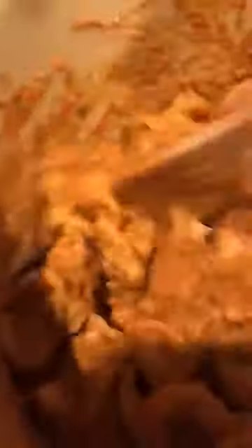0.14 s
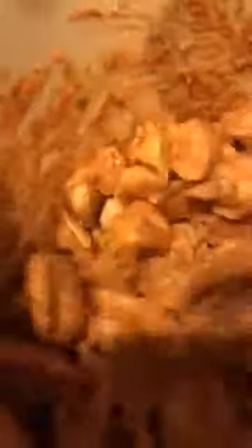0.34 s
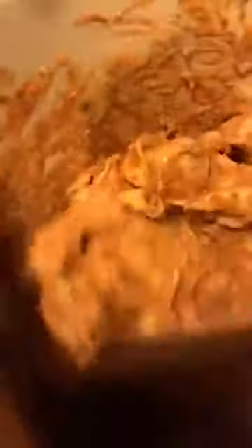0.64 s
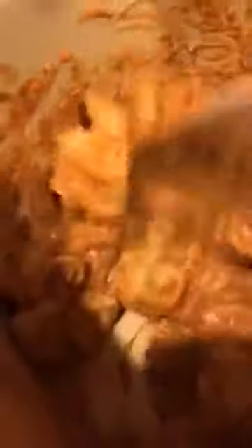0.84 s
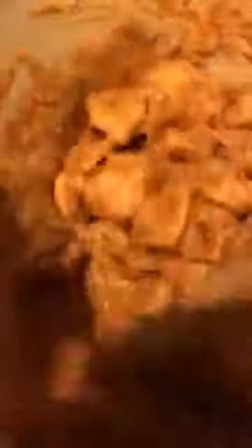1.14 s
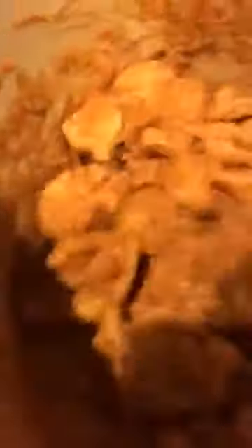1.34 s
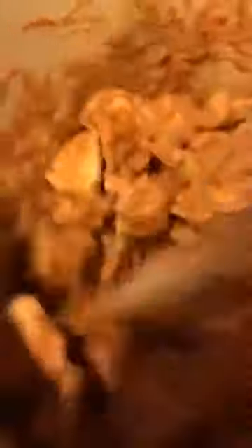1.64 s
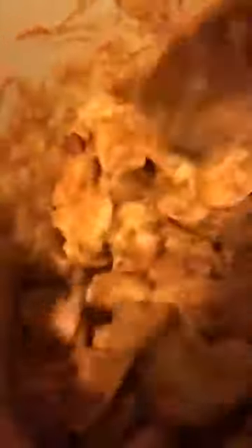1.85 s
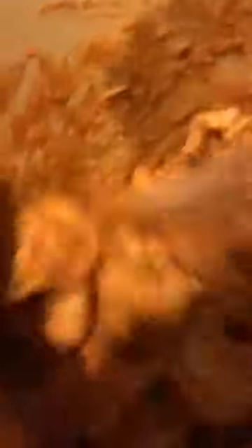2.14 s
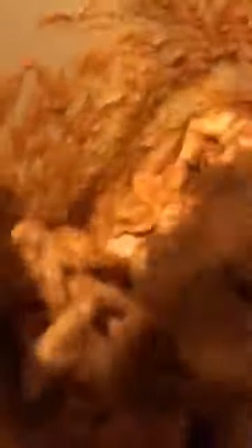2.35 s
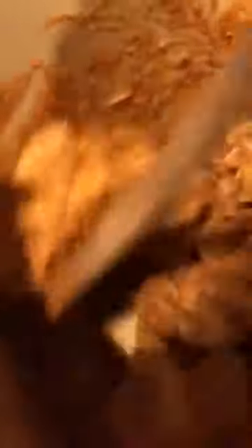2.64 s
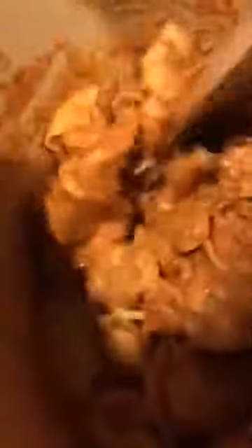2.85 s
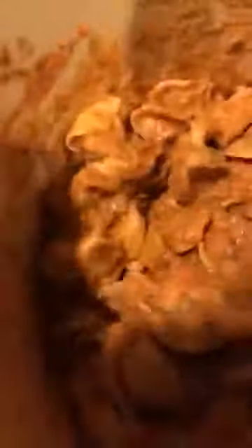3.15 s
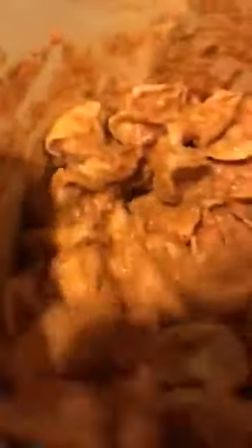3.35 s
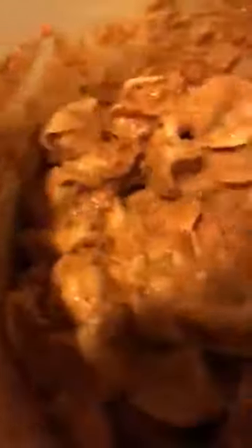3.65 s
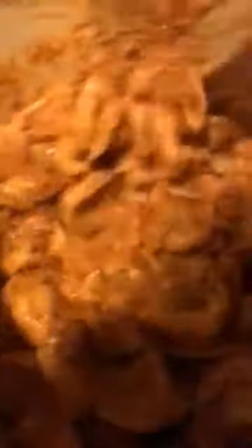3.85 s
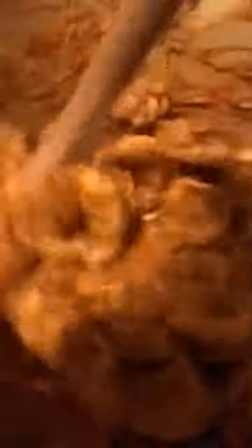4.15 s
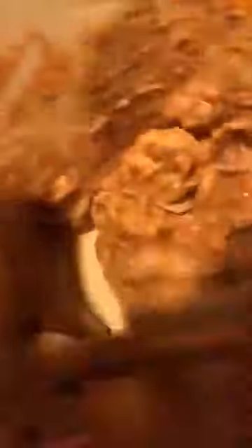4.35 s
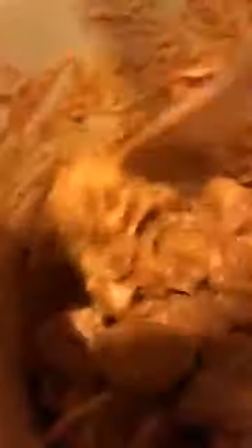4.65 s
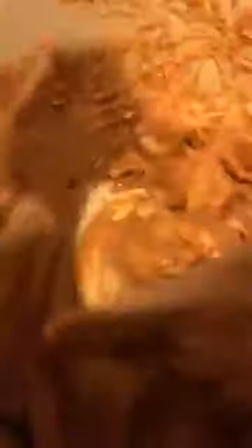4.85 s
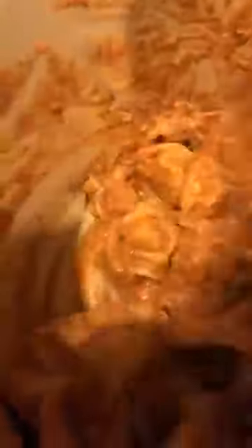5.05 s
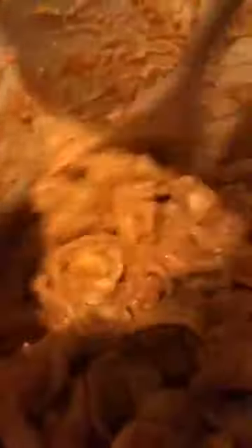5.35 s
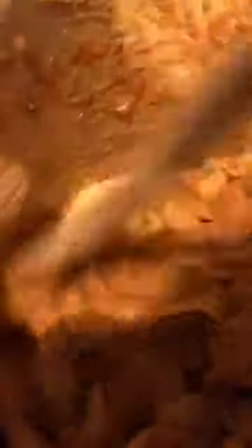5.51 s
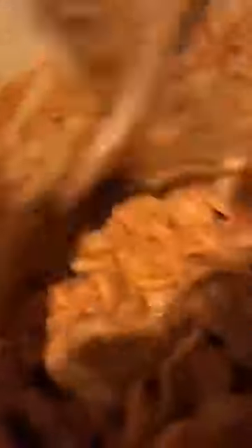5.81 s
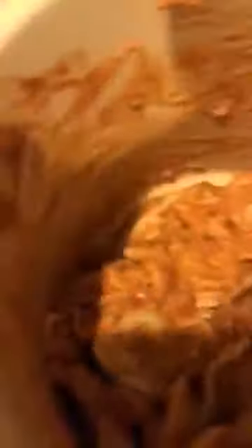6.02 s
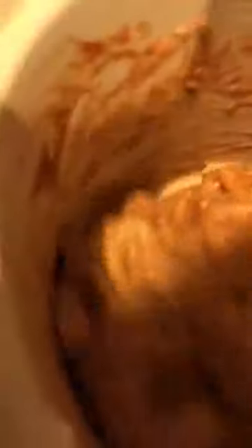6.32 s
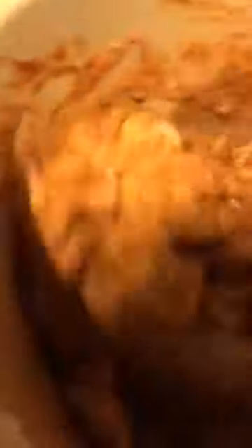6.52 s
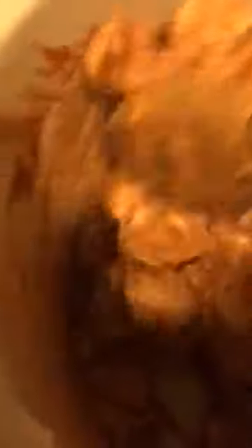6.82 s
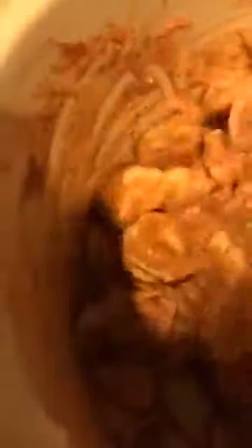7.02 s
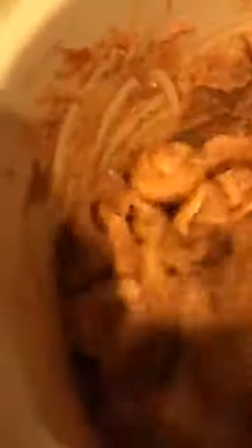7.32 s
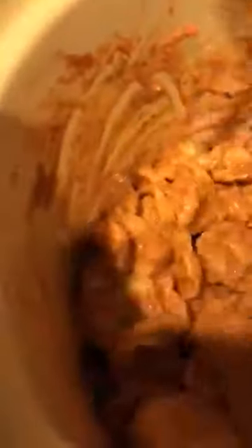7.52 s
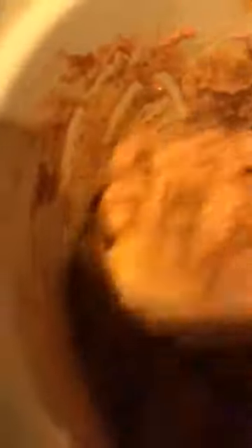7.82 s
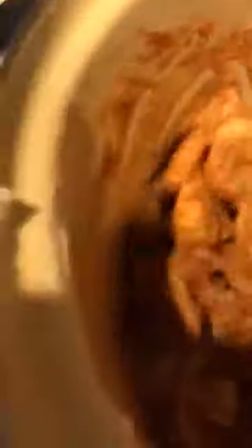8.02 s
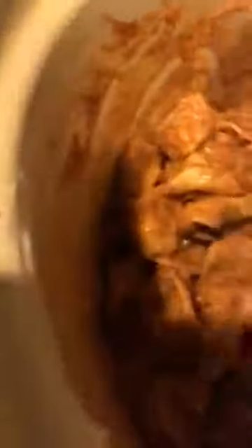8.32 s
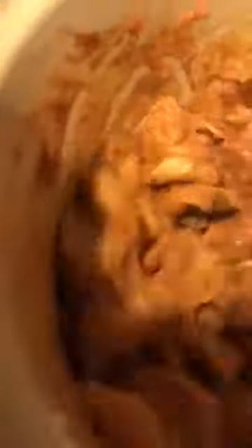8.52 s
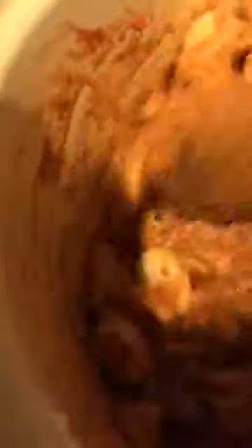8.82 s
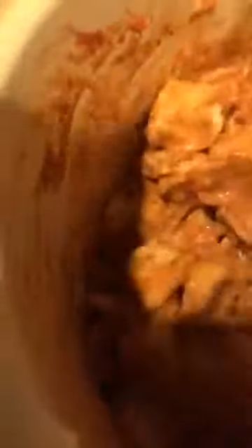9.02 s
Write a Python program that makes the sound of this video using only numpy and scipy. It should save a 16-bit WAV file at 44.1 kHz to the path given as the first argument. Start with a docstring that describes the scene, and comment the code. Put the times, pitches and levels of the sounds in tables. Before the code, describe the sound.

Wet, sticky squelches come in uneven strokes, about two a second, as pasta is folded through heavy sauce in a pot. Small pops and crisp wet snaps run all through it, over faint hollow rubbing and soft thuds. Every so often the wooden spoon hits the pot wall with a dull knock or a sharper clack. The sound is close, in a quiet kitchen with a slight room echo.

```python
"""A small kitchen: a wooden spoon stirs pasta through thick sauce in a deep pot, close to a mono microphone.
Each stroke squelches and crackles, and the spoon hums along the wall. Air pockets pop, films of sauce
snap and the mass slumps with low thumps. The spoon knocks the pot, whose ring the sauce damps.
The room answers over a quiet floor."""
import sys
import numpy as np
from scipy import signal
from scipy.fft import rfft, irfft, next_fast_len
from scipy.io import wavfile
from scipy.ndimage import uniform_filter1d, map_coordinates

SR = 44100
rng = np.random.default_rng(int(sys.argv[2]) if len(sys.argv) > 2 else 0)


def transcribe(signal):
    """Save signal, clipped to [-1, 1], as a 16-bit WAV file at the path in sys.argv[1]."""
    frames = np.atleast_2d(signal).T
    limited = np.clip(frames, -1, 1)
    pcm = np.round(limited * 32767).astype(np.int16)
    wavfile.write(sys.argv[1], SR, pcm)


N = 404397

# spectrum of sliding sauce: freq_hz, density_db
SQUELCH = [(88, -37), (150, -33), (231, -12), (325, -2), (397, -6.5), (592, -6), (713, -15.5), (1150, -1.5),
           (1940, -3.5), (2300, -6), (3140, -10.5), (3550, -18), (6000, -36), (7800, 6.5), (13200, -120)]
# spectrum of bursting films: freq_hz, density_db
CRACKLE = [(1180, -6.5), (2000, -36.5), (2280, -4.5), (3140, -9.5), (3550, -3.5), (6190, -9.5),
           (10400, -18.5), (13500, -20), (15800, -28), (16500, -52.5)]


def amp(db):
    """Decibels to gain."""
    return 10 ** (np.asarray(db) / 20)


def unit(x):
    """Scale to rms 1."""
    return x / np.sqrt(np.mean(x ** 2) + 1e-20)


def along(points, hz):
    """Read (freq_hz, value) points on a log axis."""
    freq_hz, values = np.transpose(points)
    return np.interp(np.log(hz + 1), np.log(freq_hz + 1), values)


def filtered(x, response):
    """Apply a frequency response."""
    size = next_fast_len(len(x) + 8192)
    return irfft(rfft(x, size) * response(np.fft.rfftfreq(size, 1 / SR)), size)[:len(x)]


def muffled(x, cutoff_hz=5000):
    """Steep low-pass."""
    return filtered(x, lambda hz: 1 / (1 + (hz / cutoff_hz) ** 8))


def coloured(x, spectrum):
    """Shape by a spectrum; rms 1."""
    return unit(filtered(x, lambda hz: amp(along(spectrum, hz))))


def patchy(spectrum, wander_db):
    """Noise whose gain wanders in small time-frequency patches; rms 1."""
    bins = signal.stft(rng.standard_normal(N), nperseg=256)[2]
    field = uniform_filter1d(rng.standard_normal(bins.shape), size=7, axis=0)
    field = uniform_filter1d(field, size=5, axis=1)
    noise = signal.istft(bins * amp(wander_db * unit(field)), nperseg=256)[1]
    return coloured(noise[:N], spectrum)


def add(track, start_s, sound):
    """Mix a sound into the track."""
    track[round(start_s * SR):][:len(sound)] += sound


def swell(t, rise_s, t60_s):
    """Envelope of a soft wet contact: gradual rise, then decay."""
    return (1 - np.exp(-t / rise_s)) ** 2 * amp(-60 * t / t60_s)


def bumps(rows):
    """Sum of envelopes with exponential rise and fall."""
    t = np.arange(N) / SR
    return sum(amp(db) * np.exp(-np.where(t < peak_s, (peak_s - t) / rise_s, (t - peak_s) / fall_s))
               for peak_s, db, rise_s, fall_s in rows)


def bubbles(count, centre_hz, spread_oct, decay_cycles, spread_db):
    """Tiny bubbles at random times: damped sines, pitch rising as they open."""
    when, pitch, size = rng.random(count), rng.standard_normal(count), rng.random(count)
    hz = np.clip(centre_hz * 2 ** (spread_oct * pitch), 250, 15000)[:, None]
    age = np.arange(500)
    cycles = hz * age / SR
    envelope = (1 - np.exp(-cycles)) * np.exp(-cycles / decay_cycles)
    chirps = np.sin(2 * np.pi * cycles * (1 + 0.011 * cycles))
    waves = amp(spread_db * size ** 3)[:, None] * chirps * envelope
    index = (when * N).astype(int)[:, None] + age
    return np.bincount(index.ravel(), waves.ravel(), N + len(age))[:N]


def stroke_gains():
    """Squelch, crackle and scrape gains: a stroke rises fast, sags as the spoon slows, dies away."""
    # spoon strokes: start_s, length_s, squelch_db, crackle_db, scrape_db
    strokes = [(0, 0.35, -53, -55, -51), (0.558, 0.38, -47.5, -61, -60), (1.042, 0.42, -54, -57.5, -66),
               (2, .38, -60.5, -59, -61), (2.489, 0.39, -49.5, -59.5, -57.5),
               (3.021, 0.35, -53.5, -57, -65), (3.503, 0.36, -76, -61.5, -51.5),
               (4.052, 0.26, -55, -62, -53), (4.394, 0.66, -52.5, -55.5, -58),
               (5.139, 0.48, -49.5, -58, -56.5), (5.784, 0.54, -69.5, -63, -57.5),
               (6.115, 0.6, -57, -62, -51.5), (6.928, 0.46, -56, -61.5, -61), (7.662, 0.41, -56, -63, -62),
               (8.26, 0.47, -56, -66.5, -77), (8.78, 0.43, -59.5, -65, -74)]
    rise_db_per_s, sag_db_per_s, fall_db_per_s = 288.5, 7, 155.5
    rest_db = (-76, -74, -74)
    t, power = np.arange(N) / SR, amp(rest_db)[:, None] ** 2
    for start_s, length_s, *levels_db in strokes:
        shape_db = (-rise_db_per_s * np.maximum(start_s - t, 0)
                    - sag_db_per_s * np.maximum(t - start_s, 0)
                    - fall_db_per_s * np.maximum(t - start_s - length_s, 0))
        power = power + (amp(levels_db)[:, None] * amp(shape_db)) ** 2
    return np.sqrt(power)


def stirring(squelch_gain, crackle_gain):
    """Bubbles and films burst in clumps as the sauce slides and the pasta peels apart."""
    # folds of pasta parting: peak_s, level_db, time_constant_s
    peels = [(0.13, -41, .03), (0.313, -46, 0.055), (0.574, -41, 0.014), (0.661, -40, 0.018),
             (1.179, -41, 0.026), (1.48, -50.5, 0.064), (1.667, -38, 0.065), (2.197, -27, 0.02),
             (2.529, -37, 0.028), (2.896, -49.5, 0.027), (3.125, -50, 0.025), (3.267, -44, 0.016),
             (3.688, -41.5, 0.093), (4.272, -38.5, 0.019), (4.644, -36, 0.051), (4.85, -35.5, .03),
             (5.219, -38.5, 0.018), (5.58, -46, 0.02), (5.812, -48, 0.031), (5.973, -40, 0.01),
             (6.09, -47, 0.056), (7.004, -49, 0.045), (7.336, -51, 0.028), (7.726, -50.5, .03),
             (7.82, -57, 0.06), (8.46, -51.5, 0.08), (8.795, -61, 0.013), (9.02, -64, 0.061)]
    peel_gain = bumps((peak_s, db, tau_s, tau_s) for peak_s, db, tau_s in peels)
    clumps = map_coordinates(rng.standard_normal(N // 1000 + 4), [np.arange(N) / 1000])
    films = bubbles(count=8000, centre_hz=4200, spread_oct=0.8, decay_cycles=3, spread_db=13)
    films = unit(filtered(films, lambda hz: hz > 2000))
    slide = patchy(SQUELCH, wander_db=3.5)
    froth = bubbles(count=9000, centre_hz=1600, spread_oct=1.1, decay_cycles=1.6, spread_db=13)
    squelch = muffled(amp(3.15 * clumps) * coloured(froth, SQUELCH) + amp(-4.5) * slide)
    crackle = amp(5.9 * clumps - 2) * films + amp(1) * patchy(CRACKLE, wander_db=6.3)
    return (amp(-6.5) * (squelch_gain + peel_gain) * squelch
            + amp(-4) * (crackle_gain + amp(-17.5) * peel_gain) * crackle)


def scraping(scrape_gain):
    """Wood rubbing through sauce keeps the hollow of the pot humming."""
    # resonances of the rubbed pot: centre_hz, width_hz, level_db
    resonances = [(330, 120, -8.5), (520, 58, 1.5), (800, 65, -1.5), (970, 97, -2), (1400, 70, -13)]

    def hollow(hz):
        return sum((-1) ** k * amp(db) * 1j * hz * width_hz
                   / (centre_hz ** 2 - hz ** 2 + 1j * hz * width_hz)
                   for k, (centre_hz, width_hz, db) in enumerate(resonances))

    return amp(-6) * scrape_gain * unit(filtered(rng.standard_normal(N), hollow))


def pops():
    """An air pocket rings briefly, pitch rising as it opens, inside a wet smack."""
    # bursting pockets: start_s, tone_db, pitch_hz, smack_db
    pockets = [(.049, -37, 1030, -33.5), (.219, -30, 1080, -35), (.248, -27, 413, -34),
               (0.25, -27.5, 1320, -46), (.292, -25.5, 450, -36), (.309, -28.5, 1045, -33),
               (.372, -43, 1350, -34.5), (.427, -42, 520, -35), (.653, -33.5, 540, -34),
               (0.759, -36.5, 1770, -42), (.858, -48, 1320, -36), (.927, -34, 1370, -36.5),
               (.942, -35, 990, -33), (.99, -46, 1210, -53), (1.021, -38, 4200, -32.5),
               (1.03, -46, 1190, -30), (1.183, -37, 516, -50), (1.19, -30, 1480, -29.5),
               (1.28, -48, 464, -38), (1.295, -43, 2200, -44), (1.418, -35.5, 1050, -44),
               (1.432, -38, 1040, -36), (1.487, -37, 1500, -43), (1.497, -26.5, 1660, -25),
               (1.636, -23.5, 2170, -45), (1.672, -35, 1350, -30), (1.896, -45, 1670, -43),
               (2.018, -49, 1020, -30.5), (2.038, -40, 2500, -26), (2.102, -41, 940, -34.5),
               (2.131, -35.5, 960, -36), (2.16, -47, 1440, -55), (2.183, -27.5, 367, -31),
               (2.197, -28.5, 1100, -22.5), (2.219, -45, 1210, -29), (2.256, -38, 1282, -54),
               (2.326, -49, 2470, -39), (2.456, -44.5, 2100, -48.5), (2.738, -38.5, 1000, -33),
               (2.791, -48, 1320, -32), (2.817, -37, 2100, -39), (2.839, -39, 1110, -33),
               (2.889, -35.5, 1086, -41), (2.992, -47, 1130, -45), (3.089, -38, 1090, -34.5),
               (3.13, -34.5, 1390, -37), (3.16, -37, 1520, -36), (3.194, -40, 1340, -46),
               (3.243, -34.5, 3740, -33), (3.289, -32.5, 1210, -28), (3.325, -36.5, 3580, -41.5),
               (3.393, -36.5, 3360, -44), (3.53, -51, 993, -32.5), (3.629, -35, 540, -46),
               (3.65, -36.5, 544, -29.5), (3.797, -37, 523, -41), (3.906, -44, 870, -60.5),
               (3.955, -44, 925, -52), (4.032, -34, 1470, -34.5), (4.061, -34, 1320, -40.5),
               (4.077, -40.5, 620, -39), (4.097, -50, 1450, -31.5), (4.294, -37.5, 1030, -36),
               (4.396, -39, 3320, -56), (4.439, -45, 447, -31), (4.48, -36, 1800, -53),
               (4.514, -35, 1560, -52), (4.526, -32, 1680, -29), (4.567, -38, 1050, -33),
               (4.582, -29.5, 1050, -28), (4.605, -31, 2280, -45), (4.622, -32, 403, -41),
               (4.634, -26, 1120, -28.5), (4.657, -35, 1220, -20), (4.745, -37, 428, -37),
               (4.79, -42, 1100, -32), (4.879, -30, 1090, -39.5), (4.966, -44, 2680, -39),
               (5.049, -45, 1490, -48), (5.295, -41, 1370, -40.5), (5.333, -33, 1110, -53),
               (5.345, -25.5, 1326, -36), (5.378, -29.5, 470, -53), (5.418, -41, 1360, -41),
               (5.45, -41, 1350, -38), (5.477, -43, 477, -41), (5.547, -37, 1000, -31),
               (5.627, -43, 1130, -38), (5.724, -45, 2250, -54), (5.765, -44, 2190, -58),
               (5.813, -41.5, 496, -37), (5.862, -43, 2210, -36), (5.873, -46, 3980, -50.5),
               (5.979, -36.5, 1120, -44), (6.022, -37, 4040, -55), (6.055, -40, 1530, -23.5),
               (6.128, -36.5, 1800, -40), (6.2, -40, 460, -37.5), (6.283, -47, 850, -42.5),
               (6.371, -42, 1600, -51), (6.405, -36.5, 4220, -61), (6.463, -43, 1310, -62),
               (6.592, -40, 1240, -38), (6.764, -45.5, 828, -44.5), (6.804, -35, 2590, -57),
               (6.893, -37.5, 850, -42), (6.913, -36, 1380, -56), (6.946, -35.5, 1330, -51),
               (6.96, -37.5, 1420, -60), (6.987, -39, 1470, -33), (7.024, -28, 1490, -35.5),
               (7.087, -42, 1390, -36), (7.11, -42, 1040, -60), (7.164, -41.5, 530, -60),
               (7.376, -53.5, 1060, -42), (7.422, -46.5, 498, -57), (8.157, -44, 2790, -43),
               (8.275, -40.5, 1030, -34.5), (8.436, -36, 920, -26), (8.525, -40, 1115, -45),
               (8.68, -39.5, 1680, -41.5), (8.766, -46, 1960, -38.5), (8.783, -41, 455, -34),
               (8.817, -38, 1186, -42.5), (8.917, -40.5, 1130, -33.5), (8.929, -35.5, 530, -39),
               (8.952, -30, 2720, -28.5), (8.968, -38, 1065, -48), (9.083, -45, 1340, -70)]
    tone, smack_gain = np.zeros((2, N + SR))
    t = np.arange(SR // 10) / SR
    for start_s, tone_db, pitch_hz, smack_db in pockets:
        t60_s = 0.019 * min(1, 900 / pitch_hz) ** 0.4
        chirp = np.sin(2 * np.pi * pitch_hz * t * (1 + 4 * t))
        add(tone, start_s, amp(tone_db + 9) * swell(t, 0.0012, t60_s) * chirp)
        add(smack_gain, start_s, amp(smack_db) * swell(t, rise_s=0.0015, t60_s=0.025))
    smack = filtered(patchy(SQUELCH, wander_db=2.5),
                     lambda hz: amp(-0.4 * along(SQUELCH, hz)) * (hz > 400) * (hz < 4500))
    return tone[:N] + smack_gain[:N] * unit(smack)


def snaps():
    """A tearing film of sauce hisses briefly; thicker films reach lower."""
    # tearing films: start_s, level_db, low_band_offset_db
    tears = [(0.1238, -31, -9.5), (0.245, -35.5, -2), (0.3086, -31.5, -11), (0.408, -49, -15),
             (0.4264, -36.5, -21), (0.5305, -36, -13), (0.5501, -24.5, 0), (0.6513, -34.5, -3.5),
             (0.8208, -41, -6.5), (0.9436, -37, -16), (1.057, -54, -8), (1.0837, -36, -5),
             (1.1483, -44, -12), (1.1798, -28.5, -8), (1.2481, -42, -8), (1.3389, -42.5, -4),
             (1.372, -51, -13), (1.407, -38.5, -1.5), (1.493, -37, -12), (1.5484, -40, -9),
             (1.6302, -41, -13), (1.6492, -44, -8), (1.676, -35, -3), (1.974, -39, -18), (2.0198, -36, -9),
             (2.134, -50.5, -3), (2.1854, -38, -8), (2.247, -34, -14), (2.266, -39, -18), (2.288, -40, -8),
             (2.3224, -44.5, 4.5), (2.4898, -24, -2), (2.6996, -41, -14), (2.934, -43, -3.5),
             (2.969, -42, -23), (2.9996, -54, -13), (3.0126, -46, -13), (3.037, -40, -18),
             (3.1108, -53, -8), (3.161, -34, -4), (3.231, -38, -14), (3.2834, -40, -1), (3.3243, -40, -1),
             (3.4994, -51, -6), (3.5912, -42, -12), (3.873, -46, -13), (4.0702, -37, -21),
             (4.1719, -39, -4), (4.2163, -45, -7), (4.2961, -46, -14), (4.3395, -40, -18), (4.363, -39, -5),
             (4.4084, -58, -8), (4.429, -44, -3), (4.512, -43, -8), (4.5725, -38, -11), (4.586, -39, -16),
             (4.619, -27, -6), (4.6553, -38, -5), (4.7082, -35, 3.5), (4.814, -36, 1), (4.8383, -37, -6),
             (4.9146, -35, -13), (5.0025, -48, -7.5), (5.123, -35, -6), (5.1387, -12.5, -2),
             (5.5155, -47, -9), (5.5493, -25.5, -6), (5.7255, -43, -5), (5.799, -47, -5),
             (5.8157, -26.5, -14), (5.907, -44.5, -7), (5.9615, -23.5, -11), (6.0227, -45, -5),
             (6.0696, -40, -8), (6.2033, -37, -2), (6.3004, -35, -16), (6.37, -38.5, -8), (6.492, -52, -13),
             (6.5291, -48, -11), (6.5685, -40.5, -1), (6.6862, -36.5, -6), (6.76, -40.5, -4.5),
             (6.8867, -45, -7.5), (6.9676, -41, -17), (7.0126, -41, 2), (7.0278, -28.5, -8),
             (7.423, -40, -8), (7.6283, -47, -12), (7.6568, -28.5, 2.5), (7.7376, -35.5, -12),
             (7.7794, -33.5, -3), (7.904, -47, -5), (8.237, -46, -16), (8.285, -35, -12), (8.3709, -52, -8),
             (8.4357, -33, 1), (8.6813, -42, -6), (8.7148, -34, -11), (8.9416, -37.5, -3.5)]
    high_gain, low_gain = np.zeros((2, N + SR))
    t, split_hz = np.arange(SR // 10) / SR, 5000
    for start_s, db, offset_db in tears:
        add(high_gain, start_s, amp(db - 4) * swell(t, rise_s=0.00089, t60_s=0.018))
        add(low_gain, start_s, amp(db + offset_db + 1) * swell(t, rise_s=0.0018, t60_s=0.036))
    hiss = patchy(CRACKLE, wander_db=2.9)
    high = unit(filtered(hiss, lambda hz: hz > split_hz))
    low = unit(filtered(hiss, lambda hz: hz < split_hz))
    return high_gain[:N] * high + low_gain[:N] * low


def knocks():
    """Sauce squeezes out ahead of the spoon; the blow splatters it and rings wall, belly and rim."""
    # spoon on pot: start_s, crack_db, wall_hz, wall_db, belly_hz, belly_db, rim_db,
    # focus_db_per_oct, ring_stretch, squeeze_db, rise_s
    blows = [(0.191, -31, 670, -17.5, 530, -15, -45, 23, 0.53, -43.5, 0.0017),
             (0.5501, -12, 1090, -15, 570, -22.5, -30.5, 19.5, 0.86, -37.5, 0.0009),
             (0.7071, -27, 760, -26, 515, -28.5, -41, 14.5, 0.48, -62, 0.00095),
             (1.057, -15, 1137, -21.5, 440, -36, -25, 29.5, 0.93, -43, 0.00098),
             (1.1658, -11.5, 1130, -26, 473, -44, -40, 25, 0.91, -66, 0.0015),
             (1.5486, -20.5, 1080, -18, 532, -11, -31.5, 13, 0.49, -39, 0.0015),
             (1.9724, -36, 1136, -29.5, 458, -31.5, -38.5, 35, 0.54, -59, 0.0018),
             (2.4902, -8.5, 994, -10.5, 506, -27.5, -27.5, 16, 0.66, -64, 0.0017),
             (2.608, -31, 963, -8.5, 456, -18, -52, 35, 0.51, -51, 0.0022),
             (3.0371, -27, 1030, -34, 611, -37.5, -55, 20, 0.91, -39, 0.00096),
             (3.499, -49, 755, -34, 552, -31.5, -46, 10.5, 0.46, -44, .0012),
             (3.5814, -34, 855, -30, 541, -22, -47, 36, 0.77, -41.5, 0.0016),
             (4.171, -32.5, 960, -2, 620, -13, -37, 56.5, 0.46, -67, 0.0025),
             (4.7058, -24, 1000, -24, 478, -19, -36, 30.5, 0.73, -56.5, 0.0014),
             (4.814, -30.5, 1040, -31.5, 480, -46, -39.5, 35.5, 1.17, -45, 0.0011),
             (5.1399, -11, 1188, -10, 282, -22.5, -17, 45, 1.09, -48, 0.0021),
             (5.5166, -9, 1035, -33.5, 681, -65, -34.5, 19, 1.1, -37, 0.00076),
             (6.1434, -48.5, 1040, -38.5, 463, -25.5, -65, 33, 1.2, -50, .0015),
             (7.214, -27, 897, -13.5, 540, -21, -38.5, 33.5, 0.57, -40.5, 0.0015),
             (7.6546, -7.5, 1670, -18.5, 505, -25.5, -32, 30.5, 1.13, -48, 0.0017),
             (7.7802, -35.5, 1080, -17, 460, -15.5, -35, 30, 0.73, -36, 0.002),
             (8.3705, -34, 896, -21.5, 562, -15.5, -39.5, 17, 0.59, -41, 0.0018),
             (8.4494, -5, 1003, -29.5, 530, -26.5, -35.5, 13, .81, -36, 0.0028)]
    # pot modes: freq_hz, level_db, base_decay_s
    modes = [(272, -11, 0.12), (345.6, -1, 0.077), (454.7, 9, 0.027), (521.7, 3.5, 0.037), (780, 2, 0.044),
             (898.5, 2.5, 0.027), (955.3, 5, 0.047), (1037.3, 7.5, 0.036), (1195, 9.5, 0.029),
             (1337, 8.5, 0.028), (1392, 7.5, 0.047), (1607, 6.5, 0.054), (1770, 12, 0.029),
             (2220, -0.5, 0.021), (2530, -1, 0.015), (2843, -7.5, 0.024), (3540, -6, .014),
             (4060, -3, 0.022), (5760, -9.5, 0.046), (6110, -5, 0.011)]
    mode_hz, mode_db, base_decay_s = np.transpose(modes)
    rim_hz, squeeze_lead_s = 2480, 0.012
    is_rim = mode_hz > 2000
    pot, crack_gain, squeeze_gain = np.zeros((3, N + SR))
    t = np.arange(SR // 4) / SR
    for (start_s, crack_db, wall_hz, wall_db, belly_hz, belly_db, rim_db,
         focus_db_per_oct, ring_stretch, squeeze_db, rise_s) in blows:
        wall = amp(wall_db - 0.5 - focus_db_per_oct * abs(np.log2(mode_hz / wall_hz)))
        belly = amp(belly_db + 5 - 34.6 * abs(np.log2(mode_hz / belly_hz)))
        rim = amp(rim_db + 8 + rng.standard_normal(len(modes)) - 13.2 * abs(np.log2(mode_hz / rim_hz)))
        gains = (wall + belly + rim * is_rim) * amp(mode_db)
        # clinging sauce detunes the rim
        loaded_hz = mode_hz * (1 + 0.036 * rng.standard_normal(len(modes)) * is_rim)
        for hz, gain, decay_s in zip(loaded_hz, gains, base_decay_s * ring_stretch):
            rise = (1 - np.exp(-t / rise_s * max(1, hz / 1200))) ** 2.27
            choked_ring = amp(-60 * (t / decay_s) ** 1.39)
            first_swing = amp(-12 - 60 * t / 0.007)
            linger = amp(-35 - 14 * t / decay_s) * (hz < 1900)
            envelope = rise * (choked_ring + first_swing + linger)
            add(pot, start_s, gain * amp(rng.standard_normal()) * envelope * np.sin(2 * np.pi * hz * t))
        crack = swell(t, rise_s=0.0021, t60_s=0.041) + amp(-20) * swell(t, rise_s=0.004, t60_s=0.35)
        add(crack_gain, start_s, amp(crack_db - 31) * crack)
        squeeze = swell(t, rise_s=0.00067, t60_s=0.19)
        add(squeeze_gain, start_s - squeeze_lead_s, amp(squeeze_db) * squeeze)
    splatter = patchy(CRACKLE, wander_db=2.5)
    ooze = muffled(patchy(SQUELCH, wander_db=1.5))
    return pot[:N] + crack_gain[:N] * splatter + squeeze_gain[:N] * ooze


def slumps():
    """The heavy mass creeps steadily and drops back with low thumps."""
    # thumps: peak_s, level_db
    thumps = [(.2, -45), (.28, -49), (.56, -57), (.74, -52), (1.1, -51.5), (1.23, -41.5), (1.56, -46),
              (1.65, -54), (1.79, -57), (2.02, -47), (2.199, -37.5), (2.37, -52), (2.5, -46), (2.63, -49),
              (3.22, -66), (3.52, -56), (3.6, -46), (3.98, -52), (4.19, -43.5), (4.72, -46), (4.87, -51.5),
              (5.0, -63), (5.16, -59), (5.39, -53), (5.52, -59), (5.62, -61), (5.86, -45), (6.15, -41.5),
              (7.1, -64), (7.23, -54), (7.66, -61), (7.79, -48), (8.381, -44.5), (8.48, -50), (8.81, -69)]
    # spectrum of the moving mass: freq_hz, density_db
    spectrum = [(13, -46.5), (22, -60.5), (49, 2), (96, -0.5), (135, -3), (228, -6), (263, -4.5),
                (300, -1.5), (390, -68), (660, -120)]
    rise_s, fall_s, creep_db = 0.019, 0.027, -69
    gain = amp(creep_db) + bumps((peak_s, db, rise_s, fall_s) for peak_s, db in thumps)
    return gain * coloured(rng.standard_normal(N), spectrum)


def kitchen_reverb(x):
    """Each frequency dies at its own rate; each quarter second of sound gets its own tail."""
    # room decay: freq_hz, t60_s
    decay = [(200, 0.25), (500, 0.44), (1500, 0.25), (4000, 0.2), (10000, 0.23)]
    wet, step, delay_s = np.zeros(N + 2 * SR), SR // 4, 0.006
    for start in range(0, N, step):
        hz, t, bins = signal.stft(rng.standard_normal(SR // 2), SR, nperseg=256)
        tail = signal.istft(bins * amp(-60 * t / along(decay, hz)[:, None]), SR, nperseg=256)[1]
        tail /= np.linalg.norm(tail)
        add(wet, start / SR + delay_s, signal.fftconvolve(x[start:start + step], tail))
    return wet[:N]


def room_tone():
    """Faint, patchy noise floor of the kitchen."""
    # floor spectrum: freq_hz, density_db
    spectrum = [(13, -42.5), (22, -50), (68, 18.5), (225, -29.5), (489, 0.5), (721, -24.5), (1120, -10),
                (2010, -21.5), (4250, -18), (10300, -13), (13600, -18.5), (15200, -17), (16500, -56.5)]
    return amp(-66.5) * patchy(spectrum, wander_db=4)


def scene():
    """Pot sounds over the floor; knocks, pops and snaps feed the room."""
    squelch_gain, crackle_gain, scrape_gain = stroke_gains()
    blows = knocks()
    bursts = pops() + snaps()
    stir = stirring(squelch_gain, crackle_gain) + slumps() + scraping(scrape_gain)
    room = kitchen_reverb(amp(-19) * blows + bursts / 4)
    return (blows + bursts + stir + room + room_tone())[None]


def record(dry):
    """The microphone rolls off deep bass and cuts everything above its band limit."""
    bass_hz, top_hz = 35, 16300
    thinned = filtered(dry[0], lambda hz: (1j * hz / (1j * hz + bass_hz)) ** 2)
    return filtered(thinned, lambda hz: hz < top_hz)[None]


dry = scene()
out = record(dry)
transcribe(out)
```